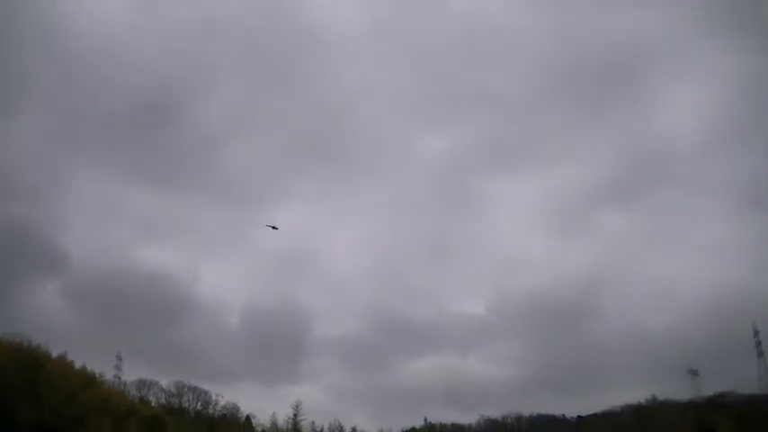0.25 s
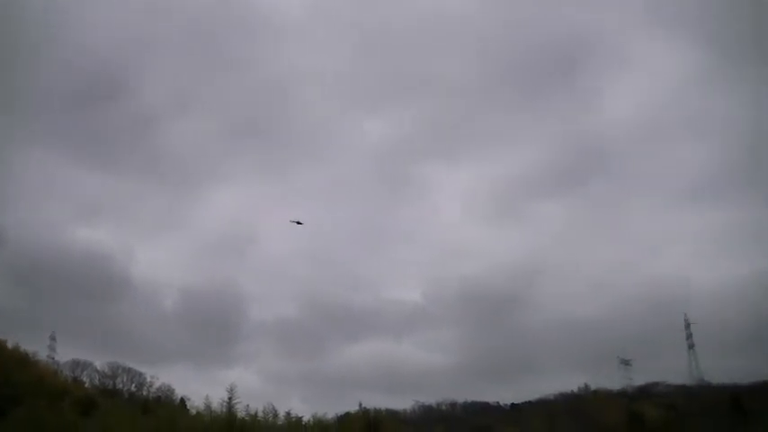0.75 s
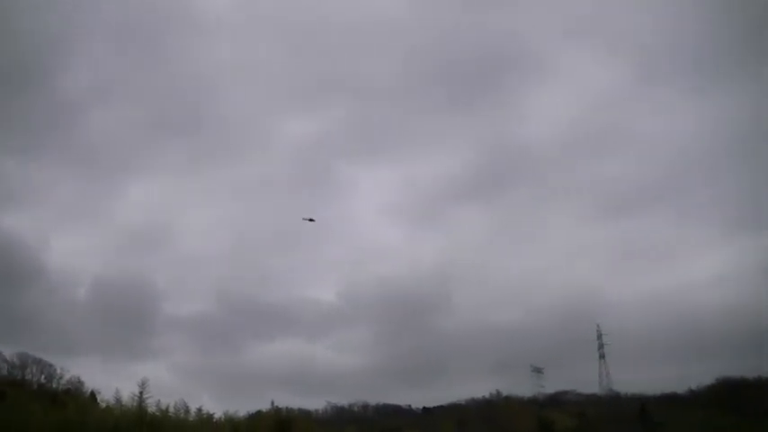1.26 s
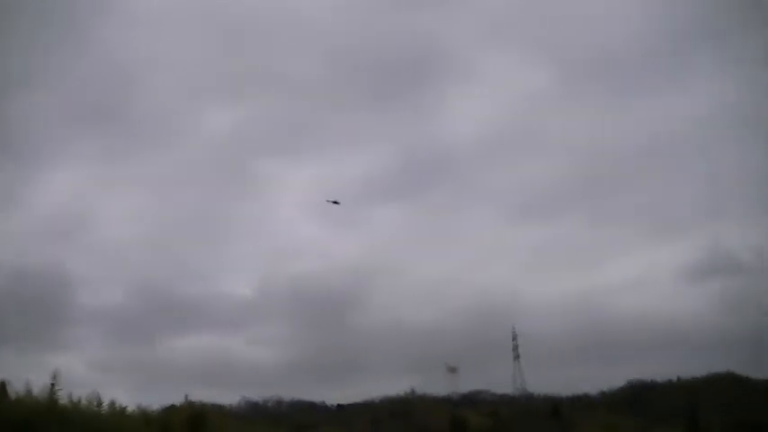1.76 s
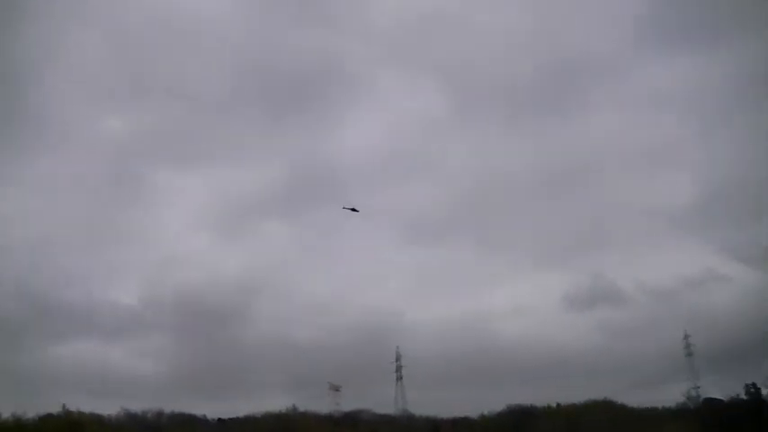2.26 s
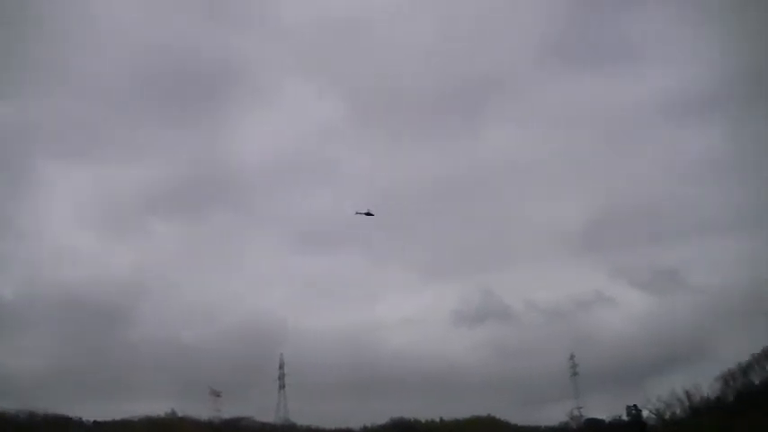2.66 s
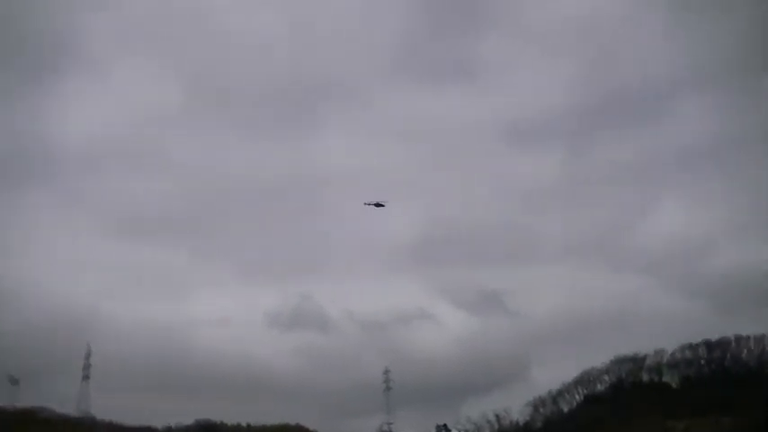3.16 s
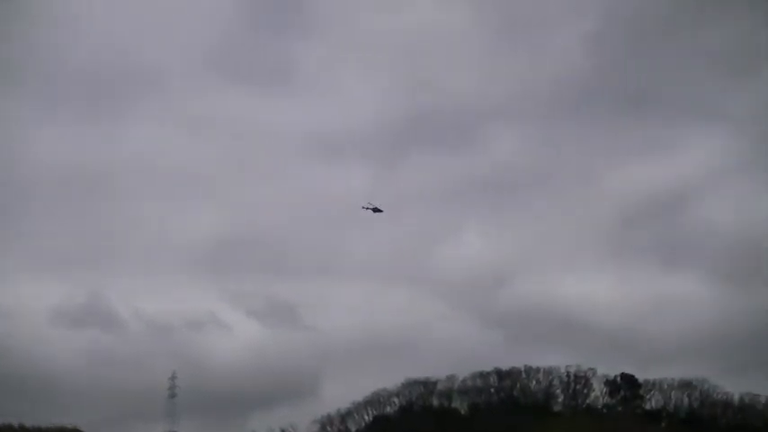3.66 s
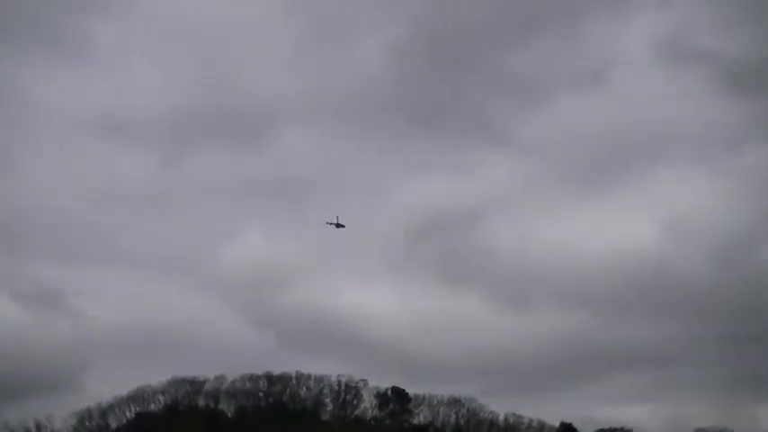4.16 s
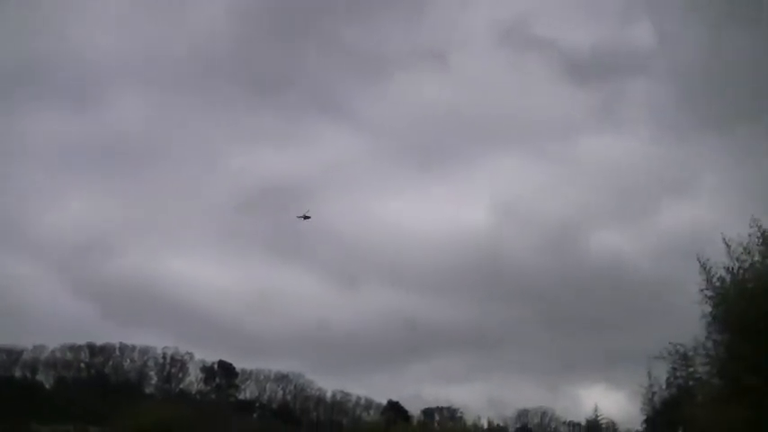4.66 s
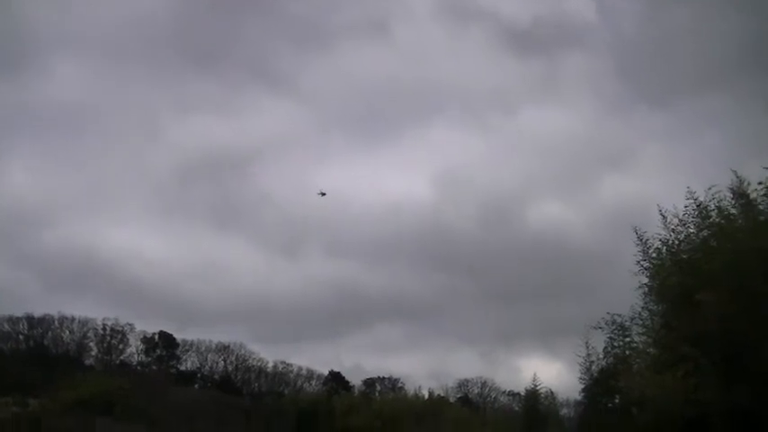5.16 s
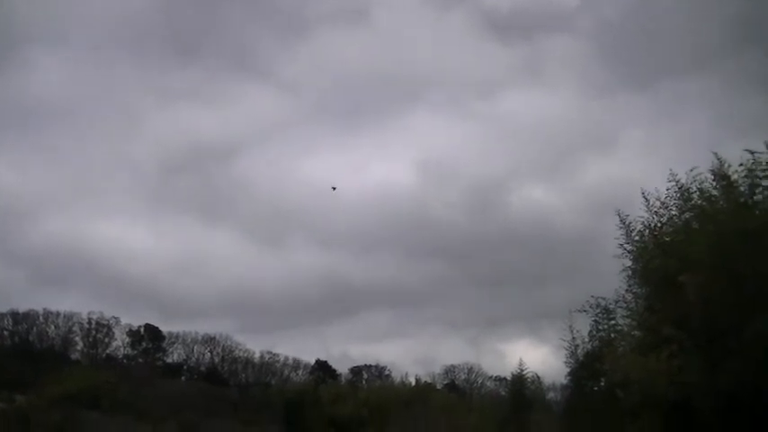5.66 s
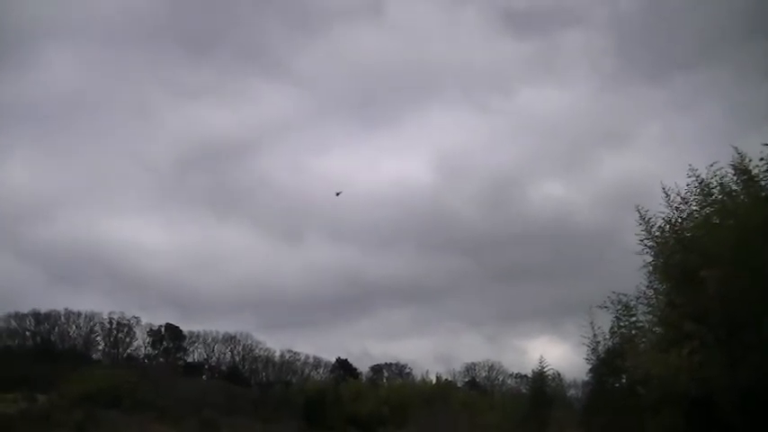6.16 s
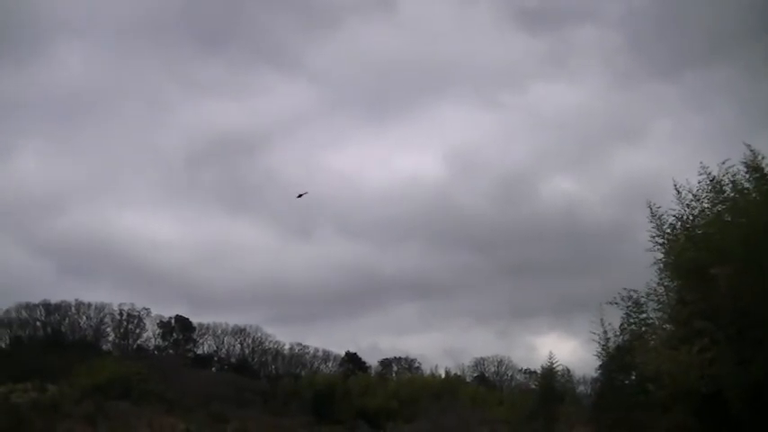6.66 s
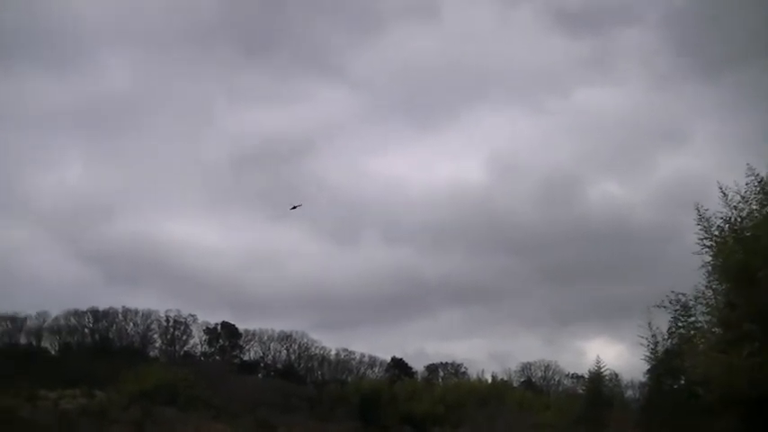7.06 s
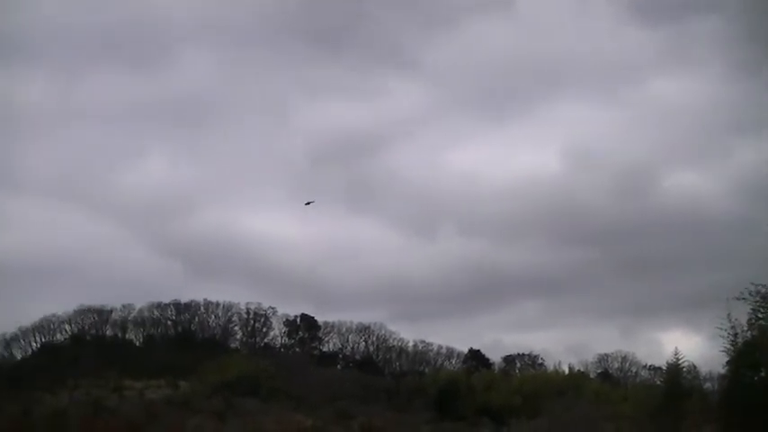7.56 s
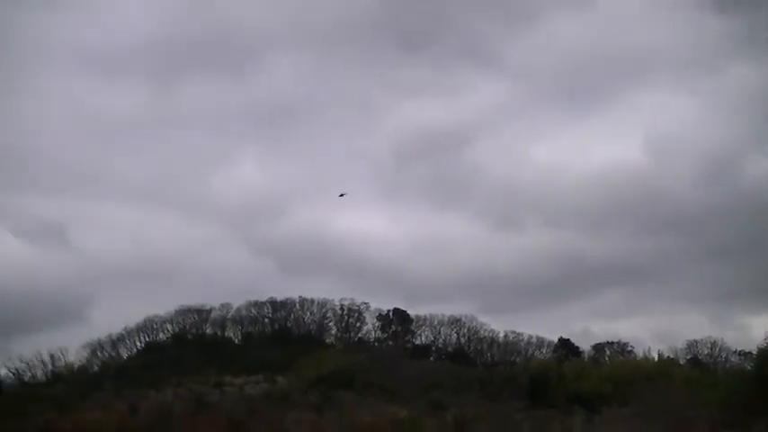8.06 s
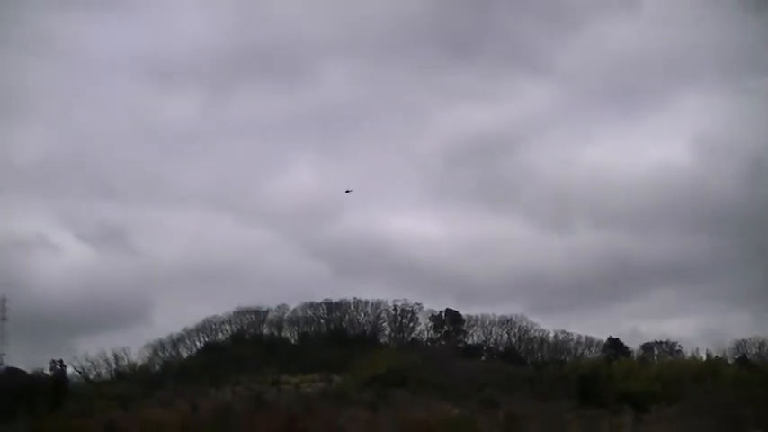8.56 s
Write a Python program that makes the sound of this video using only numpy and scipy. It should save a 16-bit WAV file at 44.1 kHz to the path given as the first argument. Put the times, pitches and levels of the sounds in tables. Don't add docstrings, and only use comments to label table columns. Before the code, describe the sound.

A radio-controlled electric helicopter flies over an open field. Its steady cluster of motor and gear whines rides on airy, fluttering blade hiss, growing loudest around three seconds. A banked turn brings a brief tonal flare and a hard plastic click, then the sound thins and sinks before its pitch climbs again. Faint valley rustle lies behind. Small handheld camera microphones give thin bass, clipped treble and a nearly central image.

```python
import sys
import numpy as np
from scipy import signal
from scipy.fft import rfft, irfft, next_fast_len
from scipy.io import wavfile
from scipy.ndimage import uniform_filter1d, map_coordinates

SR = 44100
rng = np.random.default_rng(int(sys.argv[2]) if len(sys.argv) > 2 else 0)


def rack_gain(trim_db):
    fader = np.asarray(trim_db, float)
    return 10 ** (fader / 20)


def generate_wav(sig):
    pcm = np.round(np.clip(np.atleast_2d(sig).T, -1, 1) * 32767).astype(np.int16)
    wavfile.write(sys.argv[1], SR, pcm)


N = 388521
TIME_S = np.arange(N) / SR
BLADE_PASS = 9 / 28


def evened(x):
    return x / np.sqrt(np.mean(x ** 2) + 1e-20)


def read(points, hz):
    f, value = np.transpose(points)
    return np.interp(np.log(hz + 1), np.log(f + 1), value)


def curves(rows):
    s, *columns = np.transpose(rows)
    return [np.interp(TIME_S, s, column) for column in columns]


def swell(s, span_s):
    return np.exp(-((TIME_S - s) / span_s) ** 2)


def drift(rate_hz):
    knots = rng.standard_normal(400)
    steps = np.arange(0, N + 64, 64)
    wander = map_coordinates(knots, [steps / SR * rate_hz % 390], order=3)
    return np.interp(np.arange(N), steps, wander)


def noise(points, patchy_db):
    frames, hz = N // 256 + 5, np.fft.rfftfreq(1024, 1 / SR)
    real, imaginary, patches = rng.standard_normal((frames, 513, 3)).T
    patches = uniform_filter1d(patches, size=14, axis=0)
    patches = evened(uniform_filter1d(patches, size=12, axis=1))
    colour = rack_gain(read(points, hz)[:, None] + patchy_db * patches)
    cells = (real + 1j * imaginary) * colour
    return evened(signal.istft(cells, nperseg=1024, noverlap=768)[1][:N])


def add(mix, s, sound):
    part = mix[..., round(s * SR):][..., :sound.shape[-1]]
    part += sound[..., :part.shape[-1]]


# frequency in Hz, level in dB per Hz.
RUSTLE_COLOUR = [(100, -20.5), (300, -7.5), (900, 1.5), (2000, 4), (4500, -8), (7000, -21.5), (13000, -36)]
# frequency in Hz, level in dB per Hz.
HUM_COLOUR = [(100, 0), (220, 0), (400, -20.5), (900, -27.5)]


def field():
    rustle = np.array([noise(RUSTLE_COLOUR, patchy_db=1.2), noise(RUSTLE_COLOUR, patchy_db=1.2)])
    hum_db = -62.5 + 1.2 * drift(1.5)
    return rack_gain(-60) * rustle + rack_gain(hum_db) * noise(HUM_COLOUR, patchy_db=1.0)


# peak time in seconds, peak level in dB, pitch in Hz, ring in ms, left minus right in dB.
TICKS = [(.72418, -16.5, 3200, .17, 2), (.7244, -25, 4000, .5, -2), (.7262, -32, 3800, .4, 1),
         (.7283, -32, 3500, .4, -1), (.7241, -30, 7600, .07, 5), (.7242, -31, 5600, .15, 0),
         (.7246, -30, 2700, .8, 0), (.7298, -42, 9000, .2, 1), (4.4812, -14, 6050, .45, -3),
         (4.4819, -8.5, 2700, .95, 1), (4.4812, -19, 4900, .3, -2), (4.4828, -19, 6100, .4, -2),
         (4.4846, -21, 2960, .7, -4), (4.4835, -14.5, 3950, .5, -2), (4.4817, -23, 8500, .4, -4),
         (4.4815, -23, 1550, 1.1, 1), (4.4822, -29, 800, .9, 0), (7.1622, -30, 6000, .4, -1),
         (7.1621, -33, 4700, .4, -5), (7.1621, -33, 3000, .12, -3), (7.1622, -41, 9500, .08, 0)]
# start in seconds, peak level in dB, pitch in Hz.
BUMPS = [
    (5.401, -42.5, 329),
    (5.796, -51, 275),
]


def handling():
    out, t = np.zeros((2, N)), np.arange(900) / SR
    lead_s, rise_share = .004, .9
    for s, peak_db, hz, ring_ms, pan_db in TICKS:
        ms = (t - lead_s) * 1000
        rise = np.exp(-(ms / ring_ms / rise_share) ** 2)
        shape = np.where(ms < 0, rise, 1 / np.cosh(ms / ring_ms))
        sides = rack_gain(peak_db + pan_db * np.array([[.5], [-.5]]))
        add(out, s - lead_s, sides * shape * np.sin(2 * np.pi * hz * (t - lead_s)))
    push_s = 0.0034
    for s, peak_db, pitch_hz in BUMPS:
        push = t / push_s * np.exp(1 - t / push_s)
        add(out, s, rack_gain(peak_db) * np.sin(2 * np.pi * pitch_hz * t) * push * [[1], [1]])
    return out


def ground(x, lag_ms):
    late = map_coordinates(x, [np.arange(N) - lag_ms * SR / 1000], order=1)
    wash_db = curves(BLADE_LEVELS)[0]
    share = np.clip(.62 + .055 * (wash_db + 45), .2, .9)
    grass_hz = 4800
    return x + share * signal.filtfilt(*signal.butter(1, grass_hz, fs=SR), late)


def tone(turns, order, db, flicker_db, flicker_hz):
    shake = 2 * np.pi * rng.random() + .075 * order * drift(14.)
    level = np.sqrt(2) * rack_gain(db + flicker_db * drift(flicker_hz))
    return level * np.sin(2 * np.pi * order * turns + shake)


def lobes_db(rows):
    t = np.arange(0, N / SR + .01, .01)
    gain = rack_gain(-70) + sum(rack_gain(db) * np.exp(-((t - s) / span) ** 2) for s, db, span in rows)
    return np.interp(TIME_S, t, 20 * np.log10(gain))


MOTOR_ORDERS = (2, 4, 8, 26)
TAIL_ORDERS = (1.5, 3, 4.5, 6)
GEAR_ORDERS = (2.25, 7.5, 9, 18, 26.48)
# time of the sweep in seconds, level in dB, half length in seconds.
MOTOR_LOBES = [
    [(0.45, -79, 0.44), (2.54, -63.5, 0.59), (4.63, -63.5, 0.077), (5.1, -64.0, 0.68), (7.35, -70, 2.5),
     (7.47, -63, 0.53)],
    [(0.39, -54, 0.064), (1.63, -43.5, 1.09), (3.15, -56, 0.24), (3.58, -47.4, 0.67), (4.41, -64, 0.09),
     (4.92, -53.5, 0.15), (5.92, -55, 0.6), (7.15, -66.5, 1.4)],
    [(0.51, -48.5, 0.37), (1.73, -47.4, 0.28), (2.43, -48, 0.082), (2.94, -52, 0.13), (3.64, -47, 0.29),
     (4.22, -46.5, 0.09), (4.75, -50.5, 0.91), (8.45, -54.5, 1.04)],
    [(0.97, -56, 0.5), (2.14, -50.5, 0.093), (3.64, -57.5, 1.62), (4.59, -60, 0.13), (5.78, -61, 0.35),
     (6.32, -52.5, 0.15), (6.93, -55.5, 0.096), (8.14, -57, 0.13)],
]
TAIL_LOBES = [
    [(0.79, -54.5, 0.72), (2.95, -73, 1.2), (3.0, -68, 0.18), (5.38, -66, 0.12), (5.74, -69, 0.8),
     (9.0, -58, 0.76)],
    [(0.54, -50.9, 0.27), (0.84, -53, 1.33), (4.47, -49, 0.63), (5.52, -59, 0.23), (6.66, -52.8, 0.25),
     (7.27, -53.5, 0.25), (8.52, -46.5, 1.1)],
    [(0.97, -62, 0.72), (2.53, -52, 0.26), (3.41, -60, 0.23), (3.98, -59, 0.24), (4.33, -45, 0.16),
     (4.61, -39.5, 0.11), (5.05, -53, 0.28), (9.0, -58.5, 1.3)],
    [(0.04, -49, 0.26), (1.34, -51.4, 0.3), (2.32, -48, 0.34), (2.97, -54, 0.14), (3.42, -48.4, 0.48),
     (4.39, -50, 0.34), (5.11, -53, 0.31), (6.85, -57, 0.52), (8.48, -59.5, 0.66)],
]
GEAR_LOBES = [
    [(1.53, -56.5, 0.53), (2.66, -54, 0.57), (3.55, -58.5, 0.4), (5.07, -61, 0.53), (6.8, -63.5, 0.81)],
    [(0.13, -56, 0.09), (2.45, -49.5, 0.21), (2.63, -57.5, 2.2), (3.83, -50, 0.09), (4.87, -50.5, 0.23)],
    [(1.78, -58.6, 1.5), (1.93, -53.8, 0.22), (3.68, -54, 0.37), (4.56, -52.5, 0.12), (6.56, -56, 0.064),
     (7.55, -68, 0.63)],
    [(1.8, -68, 1.2), (3.31, -62, .22), (3.82, -63, .09), (5.14, -61, .22), (6.98, -69, .2)],
    [(3.12, -73, 0.09), (3.79, -74, 0.09), (3.85, -54.5, 1.1), (4.53, -61, 0.06), (5.81, -54, 0.075),
     (7.66, -57, 0.14), (8.7, -53.5, 0.13)],
]


def strong_tones(turns):
    orders = MOTOR_ORDERS + TAIL_ORDERS + GEAR_ORDERS
    lobes = MOTOR_LOBES + TAIL_LOBES + GEAR_LOBES
    return sum(tone(turns, order, lobes_db(rows), .38 * np.sqrt(order), 13.)
               for order, rows in zip(orders, lobes))


POLE_ORDERS = (10, 12, 14, 16, 22, 24, 28, 30, 32, 48, 52)
MESH_ORDERS = (1.82, 5.25, 17.27, 18.77, 19.53, 22.52, 23.27, 25.52, 25.83, 26.16, 26.64, 50.08)
POLE_DB = [-29.5, -19, -26.5, -35.5, -30, -34, -28.5, -27.5, -33, -40.5, -40]
MESH_DB = [-29, -31.5, -23, -23, -33, -30.5, -30, -40, -36, -28, -30, -39.5]


def faint_tones(turns, off_speed_hz):
    behind_db = -0.2 * off_speed_hz
    weak = zip(POLE_ORDERS + MESH_ORDERS, POLE_DB + MESH_DB)
    return sum(tone(turns, order, db + behind_db * (order / 50) ** 2, 2.6 + order / 22, 11.)
               for order, db in weak)


# multiple of the blade pass, level in dB above the blade hiss.
SLAPS = [(4, -33), (5, -36), (6, -33), (8, -28), (9, -26), (10, -30), (11, -29), (12, -27), (15, -27),
         (19, -27), (21, -29), (24, -29)]


def slaps(turns):
    bank_db = 11.5 * swell(4.67, span_s=0.39)
    harmonics = sum(tone(turns, k * BLADE_PASS, db, 1.06, 2.4) for k, db in SLAPS)
    return rack_gain(2.0 + bank_db) * harmonics


# frequency in Hz, level in dB per Hz.
WASH_COLOUR = [(300, -41), (900, -11), (1500, 0), (2100, 3), (4000, -7.5), (7000, -12.5), (10000, -44),
               (13000, -81)]


def buzz(turns):
    passes = 2 * np.pi * BLADE_PASS * turns + .035 * drift(20.)
    pass_hz = 77
    pulses = sum(rack_gain(read(WASH_COLOUR, k * pass_hz)) * np.cos(k * passes + 2 * np.pi * rng.random())
                 for k in range(13, 44))
    return evened(pulses) * rack_gain(2.5 * drift(7.) - 7)


# frequency in Hz, level in dB per Hz.
TIPS_COLOUR = [(1500, -33), (3000, -13), (4500, -2.5), (6000, -13.5), (8000, -10.5), (10000, -17),
               (13000, -43)]
# frequency in Hz, level in dB per Hz.
RUSH_COLOUR = [(150, -52), (300, -18), (500, -8), (900, -1.5), (1300, -2.5), (2200, -10.5), (4000, -33.5)]
# time in seconds, wash in dB as distance changes, blade loading in dB.
BLADE_LEVELS = [(0.0, -49.5, -3), (.55, -48.5, -.3), (.9, -49, 0.5), (1.2, -45, 1), (1.5, -46.5, -0.8),
                (2.16, -42, -1.6), (2.7, -40.5, -1), (3.3, -41, 2.5), (3.8, -41.5, -2.3), (4.2, -45.5, 6),
                (4.7, -43.5, -2), (5.3, -50, -3), (6.3, -52.5, 2.5), (6.55, -50, -0.3), (7.2, -50.5, -4),
                (7.65, -48.5, -3.9), (8.3, -51, 0.5), (8.81, -49, 5.5)]
# time in seconds, rise in dB, length in seconds.
GUSTS = [(0.733, 1.5, 0.09), (1.14, 1.5, 0.023), (1.742, 2, .04), (2.145, 1.5, 0.077), (2.897, 1, 0.034),
         (3.443, 3.5, 0.031), (3.665, 2.5, 0.029), (3.862, 2.5, 0.093), (4.286, -0.5, 0.027),
         (4.82, 2, 0.063), (7.73, 2, 0.19)]


def blades(turns, speed_hz):
    wash_db, load_db = curves(BLADE_LEVELS)
    off_speed_hz = speed_hz - 239.5
    tips_db = -9.5 + load_db + 1.8 * drift(4.)
    rush_db = -2.5 - 0.39 * off_speed_hz + 0.16 * load_db - 0.064 * (wash_db + 50) + 2.3 * drift(4.5)

    passes = 2 * np.pi * BLADE_PASS * turns
    wash_throb = 1 + 0.043 * np.cos(passes) + .1 * np.cos(passes / 2)
    wash = noise(WASH_COLOUR, patchy_db=1.5) * wash_throb
    rush = noise(RUSH_COLOUR, patchy_db=0.5) * (1 + 0.047 * np.cos(passes + 0.69))
    tips_throb = 1 + 0.076 * np.cos(passes + 0.9) + 0.083 * np.cos(passes / 2)
    tips = noise(TIPS_COLOUR, patchy_db=1.5) * tips_throb

    loading_db = sum(db * swell(s, span) for s, db, span in GUSTS)
    gust_db = 0.55 * drift(10.0) + 1.37 * loading_db
    hiss = wash + buzz(turns) + rack_gain(rush_db) * rush + rack_gain(tips_db + gust_db) * tips
    faint_db = 3.5 - 0.37 * (wash_db + 43.5)
    rotor = hiss + rack_gain(faint_db) * faint_tones(turns, off_speed_hz) + slaps(turns)
    return rack_gain(wash_db + loading_db + 0.55 * drift(17.) + 0.56) * rotor


# time in seconds, heard shaft speed in Hz, ground echo lag in ms.
FLIGHT = [(0, 236.9, 3.3), (.6, 239.3, 3.15), (1.2, 243, 2.94), (1.8, 245.2, 3.16), (2.1, 246, 3.27),
          (2.4, 246.1, 3.34), (3, 244.2, 3.21), (3.6, 240.9, 3.25), (4.2, 237.3, 3.06), (4.5, 235.5, 2.85),
          (4.8, 234.2, 2.69), (5.4, 233.2, 2.58), (6, 232.2, 2.52), (6.6, 232.9, 2.44), (7.2, 237, 2.36),
          (7.8, 241.2, 2.35), (8.4, 244.7, 2.47), (8.81, 246.4, 2.56)]


def scene():
    speed_hz, lag_ms = curves(FLIGHT)
    turns = np.cumsum(speed_hz) / SR
    turns = turns + .0025 * np.sin(np.pi * BLADE_PASS * turns)
    helicopter = strong_tones(turns) + ground(blades(turns, speed_hz), lag_ms)
    return helicopter + field() + handling()


# frequency in Hz, floor in dB relative to the loudness.
MID_FLOOR = [(150, -54.5), (260, -44), (400, -62), (7500, -65), (8600, -47), (9500, -44.5), (13000, -44)]
SIDE_FLOOR = [(300, -70.5), (2500, -65), (5000, -61.5), (7000, -59), (13000, -57)]


def sparse(x):
    hz, t, (mid, side) = signal.stft([x[0] + x[1], x[0] - x[1]], SR, "cosine", nperseg=2048, noverlap=1024)
    loud_db = 10 * np.log10(2 * (abs(mid / 2) ** 2).sum(0) + 1e-12)
    loud_db = signal.medfilt(loud_db, 7)
    loud_db = -45.0 + 0.7 * (loud_db + 45) + 1.5 * rng.standard_normal(len(t))
    bands = uniform_filter1d(abs(side / 2) ** 2, size=16, axis=0)[8::16]
    bands = np.repeat(bands, 16, axis=0)
    bands = np.vstack([bands, bands[-1:]]) * rack_gain(5 * rng.standard_normal(len(t)))
    mid = mid * (abs(mid / 2) > rack_gain(read(MID_FLOOR, hz)[:, None] + loud_db))
    side = side * (np.sqrt(abs(bands)) > rack_gain(read(SIDE_FLOOR, hz)[:, None] + loud_db))
    sides = np.array([mid + side, mid - side]) / 2
    return signal.istft(sides, SR, "cosine", nperseg=2048, noverlap=1024)[1][:, :N]


def roll_off(x):
    return signal.sosfilt(signal.butter(12, 13920, fs=SR, output="sos"), x)


# frequency in Hz, level in dB.
MIC_RESPONSE = [(40, -77), (150, -35), (250, -8.5), (400, -3), (9000, 0)]
# frequency in Hz, left minus right in dB.
MIC_BALANCE = [(200, 3), (400, -1.2), (2200, -0.5), (4000, 0.44), (9000, 1)]


def record(dry):
    size = next_fast_len(N + 4000)
    hz = np.fft.rfftfreq(size, 1 / SR)
    balance_db = np.array([[.5], [-.5]]) * read(MIC_BALANCE, hz)
    colour = rack_gain(read(MIC_RESPONSE, hz) + balance_db)
    heard = irfft(rfft(dry, size) * colour, size)[:, :N]
    return roll_off(sparse(heard))


dry = scene()
out = record(dry)
generate_wav(out)
```